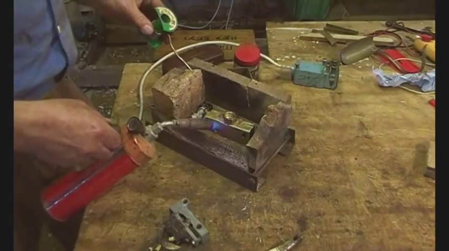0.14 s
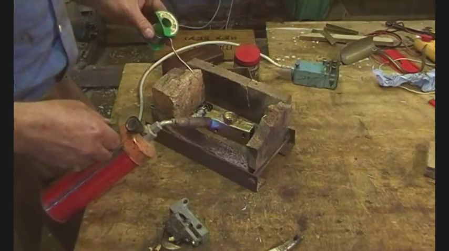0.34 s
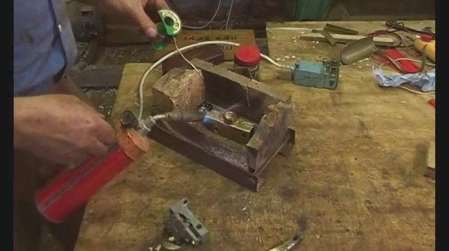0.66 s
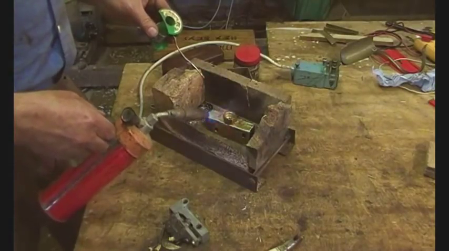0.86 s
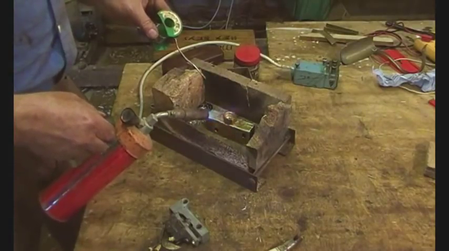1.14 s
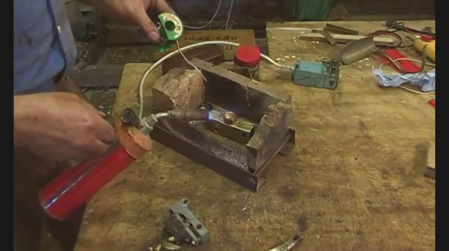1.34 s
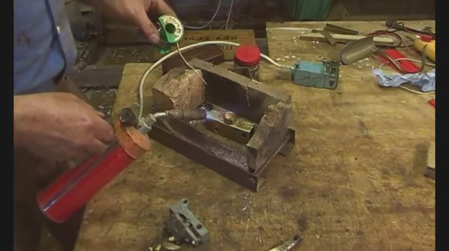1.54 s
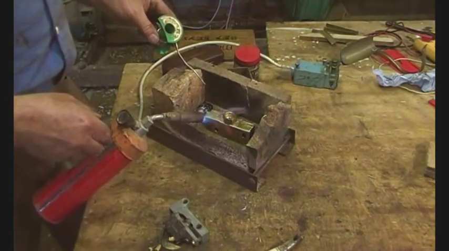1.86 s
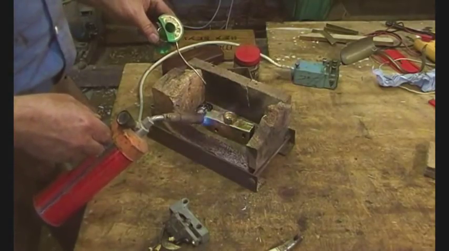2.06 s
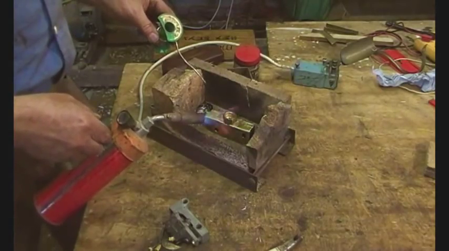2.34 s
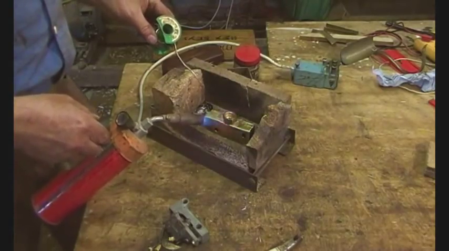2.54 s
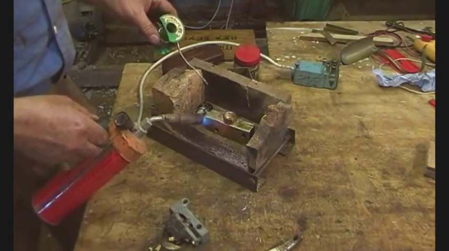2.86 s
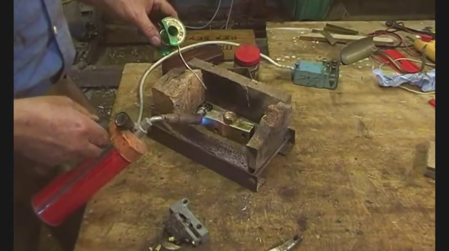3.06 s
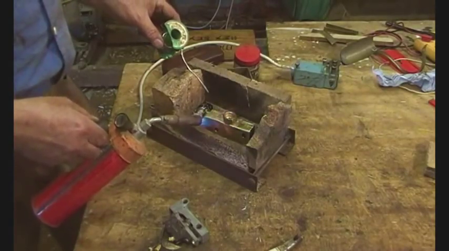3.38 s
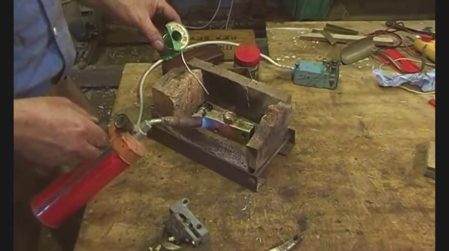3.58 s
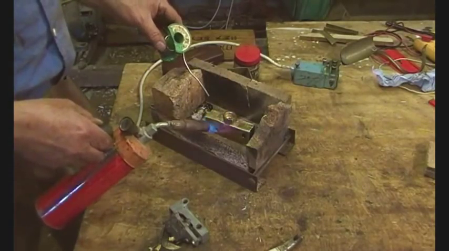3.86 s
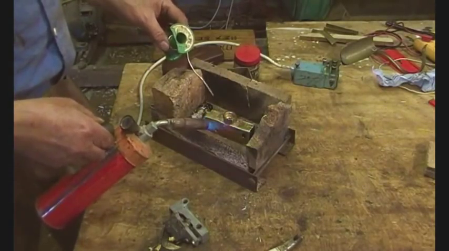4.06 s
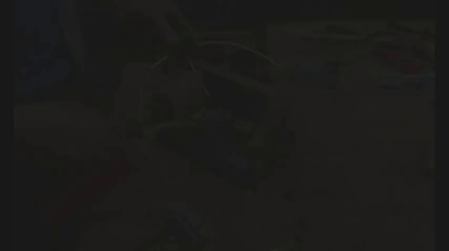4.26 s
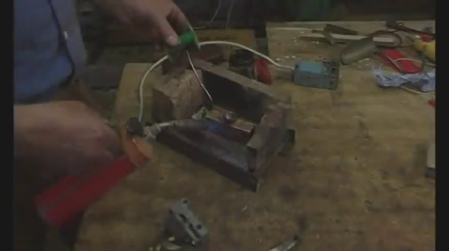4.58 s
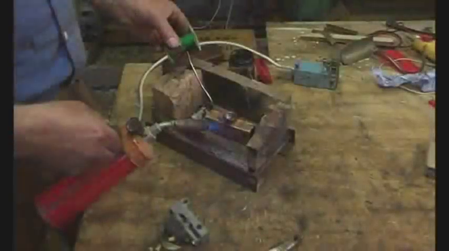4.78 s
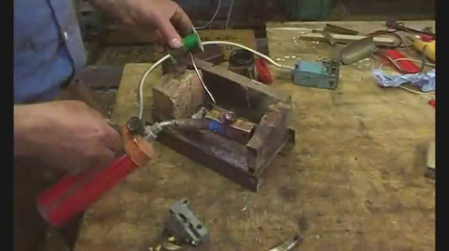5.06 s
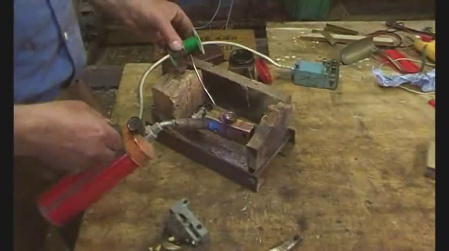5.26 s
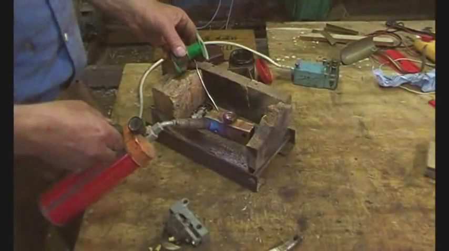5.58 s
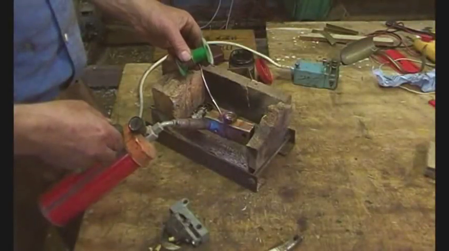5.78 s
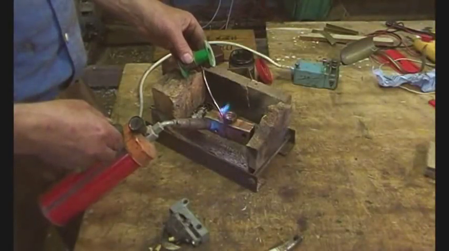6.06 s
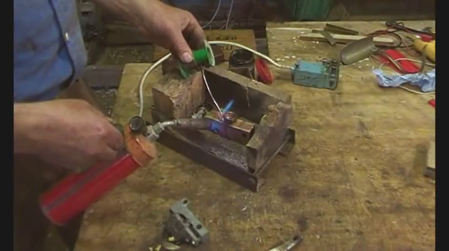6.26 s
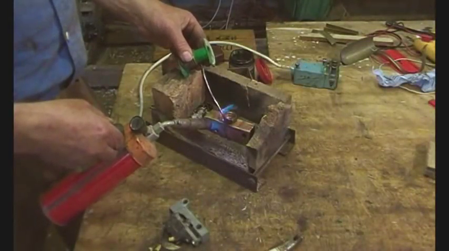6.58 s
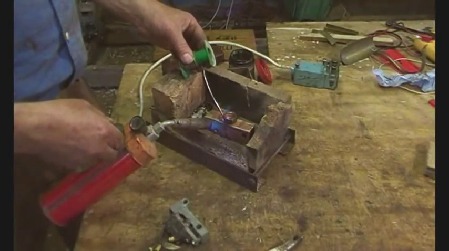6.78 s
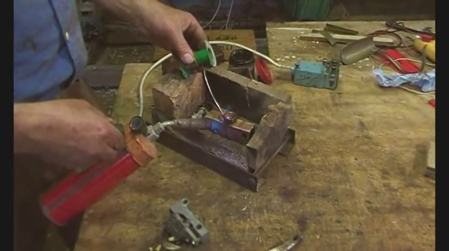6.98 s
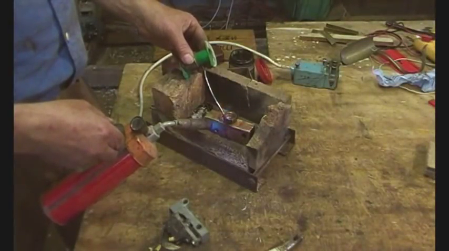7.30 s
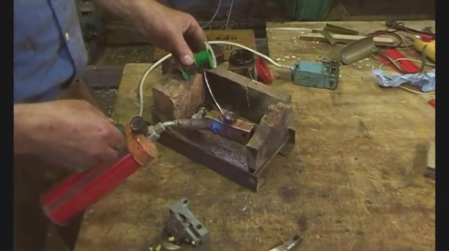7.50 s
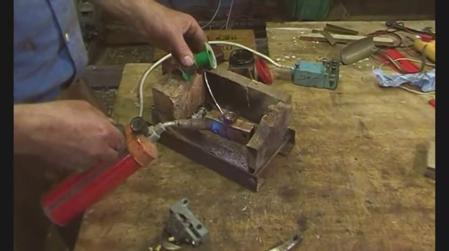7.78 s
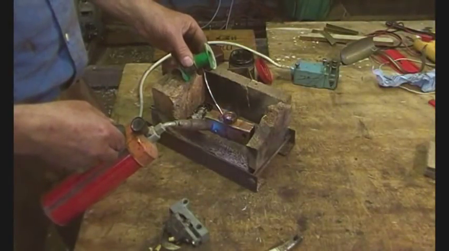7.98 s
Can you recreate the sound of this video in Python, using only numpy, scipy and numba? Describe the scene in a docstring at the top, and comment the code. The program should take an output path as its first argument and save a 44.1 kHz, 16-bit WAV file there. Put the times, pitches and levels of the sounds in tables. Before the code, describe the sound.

Steady blowtorch rush heard from bench distance: turbulent mid-low roar, windy hollow tones around it, and thin treble hiss on top. The level is slightly stronger for the first second, then nearly even, with the tone shifting gently as the flame moves. A very brief silence interrupts it halfway, after which the flame continues with a slightly altered timbre. A tiny cluster of soft fizzes appears later, slightly left. Small workshop, short blurred tail, nearly centred stereo.

```python
"""A gas torch roars steadily, with a hollow ring and a bright hiss; midway the sound drops out for an instant.
The turbulent flame is flickering noise shaped into a low roar; it rings the hollows of a small brick hearth,
whose pitches shift with the hand's grip and depth, while gas tears out of the nozzle as a treble hiss.
Flux sizzles late on. Echoes, diffuse walls and standing waves of the workshop colour the stereo sound."""
import sys
import numpy as np
from scipy import signal
from scipy.fft import rfft, irfft, next_fast_len
from scipy.io import wavfile
from scipy.ndimage import uniform_filter1d
from numba import njit

SR = 44100
rng = np.random.default_rng(int(sys.argv[2]) if len(sys.argv) > 2 else 0)


def int16_out(signal):
    """Quantize to a 16-bit WAV file."""
    q = np.round(np.clip(np.atleast_2d(signal).T, -1, 1) * 32767)
    wavfile.write(sys.argv[1], SR, q.astype(np.int16))


N = 358974
TIME_S = np.arange(N) / SR
# the torch is held one way before this moment and another way after it
REGRIP_S = 4.38


def undb(db):
    """Decibels to gain."""
    return 10 ** (np.asarray(db) / 20)


def unit(x):
    """Scale to rms 1."""
    return x / np.sqrt(np.mean(x ** 2))


def curves(table):
    """Join the rows of a timed table by straight lines: one signal per column after the time."""
    times_s, *columns = np.transpose(table)
    return [np.interp(TIME_S, times_s, column) for column in columns]


def colour(x, points, bells=()):
    """Filter by (frequency [Hz], gain [dB]) points plus bells (centre [Hz], width [Hz], gain [dB])."""
    size = next_fast_len(N)
    hz = np.arange(size // 2 + 1) * SR / size + 1  # +1 keeps the logarithm finite
    points_hz, points_db = np.array(points).T
    gain_db = np.interp(np.log(hz), np.log(points_hz), points_db)
    for centre, width, bell_db in bells:
        gain_db = gain_db + bell_db / (1 + (2 * (hz - centre) / width) ** 2)
    return irfft(rfft(x, size) * undb(gain_db), size)[..., :N]


def walk(rate_hz):
    """Random wander: steps held for 1 / rate_hz, smoothed twice over one step, rms 1."""
    step = int(SR / rate_hz)
    held = np.repeat(rng.standard_normal(N // step + 1), step)
    smooth = uniform_filter1d(uniform_filter1d(held, step), step)
    return unit(smooth[:N])


def pan(x, db):
    """Place a sound in two channels, left minus right = db."""
    return x * undb(np.array([[db], [-db]]) / 2)


@njit
def svf(x, hz, width):
    """State-variable band-pass with a moving centre, gain 1 at that centre."""
    y, band, low = np.empty(len(x)), 0., 0.
    for i in range(len(x)):
        g = np.tan(np.pi * hz[i] / SR)
        damping = width / hz[i]
        v = (band + g * (x[i] - low)) / (1 + g * (g + damping))
        band = 2 * v - band
        low = low + 2 * g * v
        y[i] = damping * v
    return y


def grip(first, second):
    """One value up to the change of grip, another after it."""
    return np.where(TIME_S < REGRIP_S, float(first), float(second))


def start():
    """Strength of the opening flame: 1 up to 0.63 s, then settling to 0 over 0.43 s."""
    return np.clip(1 - (TIME_S - 0.63) / 0.43, 0, 1)


def burning(lick_db, eddy_db):
    """Eddies of gas burn at random: noise that licks slowly and flickers fast."""
    return rng.standard_normal(N) * undb(lick_db * walk(15) + eddy_db * walk(160))


def torch():
    """Roar and hearth surge as one flame, driven by the same turbulence; the gas jet hisses on its own."""
    roar_db = -27.5 + 0.86 * start() - 0.14 * TIME_S  # fades slowly throughout
    jet_db = grip(-50.5, -49.5) - 0.5 * start()
    surge = undb(0.37 * walk(30) + 0.66 * walk(200))
    low = roar(roar_db)
    gate = 1 - 0.04 * unit(low[0])  # the hearth rings harder as the roar swings negative
    return surge * (low + gate * hearth()) + jet(jet_db)


def roar(level_db):
    """The low body of the flame: turbulent burning with slightly one-sided, leaning pressure puffs."""
    # shape of the roar: (frequency [Hz], relative density [dB per Hz])
    roar_shape = [(15, -65), (25, -37), (50, -30), (70, -21.5), (108, -17), (150, -11.5), (224, -3),
                  (291, -2.5), (405, -4.5), (544, -4.5), (694, -4), (966, -5.5), (1200, -14.5),
                  (1400, -22.5), (2100, -21), (3500, -86)]
    puff_share, puff_lean_rad = 0.06, 0.9
    body = unit(colour(burning(lick_db=0.05, eddy_db=0.54), roar_shape))
    # squaring makes the puffs one-sided; the phase turn leans them
    body = body - puff_share * unit(colour(body ** 2 - 1, roar_shape))
    body = irfft(rfft(body) * np.exp(1j * puff_lean_rad), N)
    return pan(unit(body) * undb(level_db), -0.85)


def hearth():
    """The flame excites hollows between bricks and work; each resonates and flutters a little alone."""
    # how deep the flame points into the hearth: (time [s], depth [0-1])
    depth_points = [(0, 0.2), (1.9, 0.13), (2.4, 0.12), (2.98, 0.75), (3.3, 0.5), (3.7, 0.68), (3.95, 0.7),
                    (4.1, 0.7), (4.34, 0.67), (4.42, 0.27), (5.0, 0.4), (5.7, 0.3), (6.05, 0.33),
                    (6.7, 0.28), (8.14, 0.3)]
    # hollows: (centre in first grip [Hz], level [dB], centre in second grip [Hz], level [dB],
    # extra at the start [dB], extra at full depth [dB], fall of the centre at full depth [%],
    # width of the narrowest filter stage [Hz], left minus right [dB])
    hollows = [(1200, -59, 1209, -41.5, 1, -9, .6, 94, -.4), (2225, -53, 2500, -48, -1, -3, .6, 88, -.8),
               (1790, -36.5, 1874, -37, -0.8, 0, 4.6, 500, 0.1),
               (2634, -37.5, 2780, -39, 2, 4, 4.3, 520, -0.68),
               (3115, -45, 2974, -39, 3.5, 2.5, 1.2, 380, -0.24),
               (3410, -42.5, 3393, -39.5, 4, 1.5, .6, 410, -1.5),
               (4390, -42, 4650, -48, 0.5, 5.5, 3.2, 644, -0.096)]
    depth, = curves(depth_points)
    out = 0
    for hz_1, db_1, hz_2, db_2, start_db, deep_db, fall, width, pan_db in hollows:
        level_db = grip(db_1, db_2) + start_db * start() + deep_db * depth
        hz = grip(hz_1, hz_2) * (1 - fall / 100 * depth)
        ring = burning(lick_db=0.39, eddy_db=1.04)
        for stage in (1., 2.53, 2.83):
            ring = svf(ring, hz, stage * width)
        out = out + pan(unit(ring) * undb(level_db), pan_db)
    return out


def jet(level_db):
    """Gas tearing out of the nozzle: bands of noise, where eddies of each size flicker alone."""
    # shape of the hiss: (frequency [Hz], relative gain [dB])
    hiss_shape = [(3500, -45), (5000, -4), (6020, -40), (6500, -20), (6850, -27), (7310, -5.5), (7850, 0),
                  (9300, 2), (10200, 0.5), (11000, -6.5), (12100, -12), (13000, -14), (13800, -8),
                  (14400, -35)]
    eddies = 0
    for hz in 5000 * 1.2 ** np.arange(6):
        eddy = svf(burning(lick_db=1.36, eddy_db=2.0), np.full(N, hz), hz / 5)
        eddies = eddies + eddy / np.sqrt(hz)
    hiss = unit(colour(eddies, hiss_shape))
    # the lower edge of the hiss thins through each grip, by 0.2 then 2 dB per second
    grip_age_s = TIME_S - grip(0, REGRIP_S)
    edge_db = grip(5.5, -0.5) - grip(0.2, 2) * grip_age_s
    edge = svf(hiss, np.full(N, 7060.), 1250.)
    hiss = hiss + (undb(edge_db) - 1) * edge
    return pan(hiss * undb(level_db), -0.7)


def sizzles():
    """Flux sizzles on the hot work: short swells of narrow-band noise."""
    # swells: (time [s], level at the peak before halving [dB], centre [Hz])
    sizzle_events = [(6.4976, -36, 4920), (6.6139, -33, 4640), (6.6762, -33, 4730), (6.7136, -35, 4900),
                     (6.8059, -33, 4650)]
    swell_s, width_hz = 0.008, 150.
    out = 0
    for time_s, level_db, hz in sizzle_events:
        swell = np.exp(-2 * ((TIME_S - time_s - swell_s / 2) / swell_s) ** 2)
        centre = np.full(N, float(hz))
        hiss = svf(rng.standard_normal(N), centre, width_hz)
        hiss = svf(hiss, centre, 2 * width_hz)
        out = out + undb(level_db) / 2 * swell * unit(hiss)
    return pan(out, -6)


def echoes(x):
    """Echoes off bench and bricks cancel or lift bands that slide as the hand moves."""
    # sliding bands: (width [Hz], rows of (time [s], centre [Hz], gain [dB]))
    sliding_bands = [(140, [(0, 2170, -7), (.6, 2160, -9), (.8, 2150, 0.5), (3.1, 2130, -2),
                     (3.5, 2160, -3), (4.34, 2070, -18), (4.42, 2160, -7), (8.14, 2150, -9)]),
                     (130, [(0, 2350, 0), (2.0, 2360, -1), (3.5, 2360, -6), (3.9, 2290, 0),
                     (4.34, 2250, 8.5), (4.42, 2400, -0.5), (8.14, 2400, -1)]), (130, [(0, 3000, 3),
                     (.7, 3000, -2), (.95, 2990, -10), (1.3, 2960, -4), (3.2, 2950, -1), (4.34, 2970, 1.5),
                     (4.42, 2640, 3), (6, 2650, -0.5), (8.14, 2600, -3)]), (160, [(0, 3650, 1),
                     (1.3, 3800, -3), (2.2, 3880, -4), (3, 3650, -3), (4.34, 3700, -3), (4.42, 4050, 4),
                     (5.7, 4050, 6), (6.1, 4060, -1), (8.14, 4080, 1)]), (200, [(0, 4700, -6),
                     (.8, 4500, -4), (1.2, 4350, -0.5), (4.34, 4340, -0.5), (4.42, 4380, 2),
                     (5.7, 4400, 2.5), (6.1, 4450, -3), (8.14, 4530, -3)]), (600, [(0, 10300, 1),
                     (.35, 10250, -6), (.6, 9400, -5), (.9, 8500, -13), (1.1, 8050, -9), (1.5, 8500, -2),
                     (2.5, 8800, -1), (3.0, 8550, -9), (3.4, 8700, -3), (3.9, 8700, -15), (4.34, 8440, -4),
                     (4.42, 8950, -11), (5.3, 9200, -4), (6.5, 9400, 0), (8.14, 9500, -6)]),
                     (550, [(0, 9300, 4.5), (.9, 9700, 1), (1.3, 9950, -7), (1.75, 10300, -6),
                     (1.85, 10300, 0), (1.87, 7600, -6), (2.0, 7600, -11), (2.6, 7700, -3), (3.3, 7800, -5),
                     (3.8, 8100, -9), (4.34, 7900, -1), (4.42, 8450, -4), (5.8, 8550, -2), (6.2, 8300, 3),
                     (8.14, 8200, -4)]), (300, [(0, 5050, -2), (.8, 5000, 0), (1.2, 4950, -4),
                     (2.5, 4950, -0.5), (4.34, 5000, -3), (4.42, 5170, 4.5), (8.14, 5200, 3)]),
                     (200, [(0, 3920, 4), (.7, 4000, 1.5), (1.1, 3700, 1.5), (2.5, 3700, 1),
                     (4.34, 3600, 0.5), (4.42, 3560, 0.5), (5.7, 3530, 2.5), (6.1, 3650, 0),
                     (8.14, 3650, 1.5)]), (110, [(0, 440, 2), (1, 440, -1), (2.7, 440, 0.5), (3.0, 437, -3),
                     (3.4, 440, 2), (4.4, 440, 0.5), (5.3, 440, 0.5), (5.8, 434, 3), (6.3, 437, -2),
                     (8.14, 440, 1)]), (597, [(0, 8400, 3.5), (.6, 8500, 2), (1.0, 9250, 2.5),
                     (1.5, 9100, 6), (1.8, 9200, 3), (2.1, 8300, 2), (2.6, 8500, 2.5), (3.0, 9300, 2),
                     (4.2, 9300, 4), (4.34, 9200, 2), (4.42, 8000, 4.5), (5.7, 8050, 3.5), (6.2, 8800, 2),
                     (8.14, 8800, 1.5)])]
    for width, path in sliding_bands:
        hz, gain_db = curves(path)
        band = np.array([svf(side, hz, float(width)) for side in x])
        x = x + (undb(gain_db) - 1) * band
    return x


def walls(x):
    """Walls return the treble as a short diffuse tail; its fine comb changes as the flame moves."""
    # returned treble: (frequency [Hz], level against the direct sound [dB])
    wall_levels = [(1500, -33), (2100, -17), (3000, -12.5), (4500, -10.5), (7000, -6), (12000, -16)]
    # the flame's place changes from one of these moments to the next: (time [s])
    place_times = [1.0, 3.2, 5.4, 7.3]
    t60_s, steady_share = 0.34, 0.45  # the steady share of the tail stays when the hand moves
    t = np.arange(SR // 2) / SR
    tails = rng.standard_normal((len(place_times) + 1, len(t))) * undb(-60 * t / t60_s)
    steady, *moving = tails
    treble, out = colour(x, wall_levels), 0
    for place, own in zip(np.eye(len(moving)), moving):
        tail = np.sqrt(steady_share) * steady + np.sqrt(1 - steady_share) * own
        tail = tail[None] / np.linalg.norm(tail)
        here = np.interp(TIME_S, place_times, place)  # crossfade between places
        out = out + signal.fftconvolve(treble * here, tail, axes=1)[:, :N]
    return x + out


def scatter():
    """Walls and clutter return flame unrelated to the direct sound, opposite in the two channels."""
    # scattered share: (frequency [Hz], level against the direct sound [dB])
    scatter_levels = [(25, -6), (60, -5), (130, -18), (300, -20), (700, -25), (1350, -19), (1800, -18.5),
                      (2150, -18), (2800, -19.5), (3400, -17), (3900, -7), (4400, -10), (4900, -6),
                      (5500, -2), (6800, 0), (7200, -7), (8000, -6), (9300, -7), (10200, -5), (11200, -2),
                      (12500, -1), (13700, -7)]
    other_flame = torch().mean(axis=0)  # a fresh random draw of the same torch
    return colour(other_flame, scatter_levels) * np.array([[1], [-1]])


def lead(x):
    """Turn the phase of the two channels apart, half each way, so the left mostly leads in the treble."""
    # phase of left ahead of right: (frequency [Hz], phase [rad])
    phase_points = [(20, 0), (3300, 0), (3950, .3), (4400, -.2), (5100, 1.3), (6100, .4), (7000, .1),
                    (8200, .3), (9300, .85), (10200, .3), (10850, .7), (12500, -.4), (14000, 0)]
    size = next_fast_len(N)
    hz = np.arange(size // 2 + 1) * SR / size
    turn = np.interp(hz, *np.transpose(phase_points))
    sides = np.array([[1], [-1]])
    return irfft(rfft(x, size) * np.exp(.5j * turn * sides), size)[:, :N]


def scene():
    """The torch, combed by the shop and coloured at each side, with its scattered share and the sizzles."""
    # standing waves of the shop lift or cancel narrow bands: (centre [Hz], width [Hz], gain [dB])
    shop_waves = [(115.7, 8.9, -19), (141, 13, 3), (258, 8, -1), (294, 17, 2), (316, 11, -2), (369, 6, -8),
                  (382.4, 15.2, -11.5), (404.7, 10.3, 11.5), (472, 8.7, -4.5), (479, 7.4, 3),
                  (457, 37, 6.5), (501.5, 7, -5.5), (523, 7.5, -6), (637, 9.8, 3.5), (666, 11, -3.5),
                  (743, 13, 1.5), (838, 9.2, -3.5), (970, 10, -0.5), (558, 21.4, -9.5), (616, 10, -5),
                  (690, 30, 2.5), (722, 10, -5), (782, 14, -4), (912, 16, -15), (1024, 12, -11),
                  (1048, 20, 3), (1074, 14, -12), (1129, 14, -9), (1189, 14, -9), (1249, 12, -5),
                  (1267, 22, -7), (1357, 10, -4), (1401, 10, -3), (1424, 14, 4), (1486, 10, -3),
                  (1312, 14, -5), (1343, 16, 3), (1460, 50, -4), (1545, 12, -5), (1598, 18, -7),
                  (1742, 16, -7), (1647, 20, -3), (1825, 18, -3), (1926, 22, 2), (2008, 16, -8),
                  (2100, 30, -3), (1220, 18, 2), (1515, 12, 3.5), (2065, 24, 1), (2200, 18, 0),
                  (2490, 30, 2), (3010, 24, -4), (3180, 20, -2.5), (3870, 22, 0), (4110, 24, -9),
                  (4260, 22, 2.5), (2850, 43, 3), (3440, 74, 1.5), (3600, 130, -1)]
    # treble colour of the left, then the right channel: (centre [Hz], width [Hz], gain [dB])
    side_bells = [
        [(4530, 490, -7.5), (4330, 220, 2)],
        [(4800, 340, 3), (5600, 230, -1), (11200, 910, 3.5)],
    ]
    flat = [(20, 0), (20000, 0)]
    direct = walls(echoes(torch()))
    near = np.array([colour(side, flat, list(shop_waves) + list(bells))
                     for side, bells in zip(direct, side_bells)])
    return lead(near) + scatter() + sizzles()


def record(dry):
    """The sound drops out briefly; a steep low-pass cuts everything above 14.3 kHz."""
    # the dropout, joined by straight lines: (time [s], gain [dB])
    dropout_points = [(4.3520, 0), (4.3524, -25), (4.365, -34), (4.380, -39), (4.390, -62), (4.396, -80),
                      (4.403, -65), (4.410, -13), (4.414, -5), (4.420, 0)]
    gain_db, = curves(dropout_points)
    low_pass = signal.ellip(10, .2, 80, 14300, fs=SR, output="sos")
    return signal.sosfilt(low_pass, dry * undb(gain_db))


dry = scene()
out = record(dry)
int16_out(out)
```